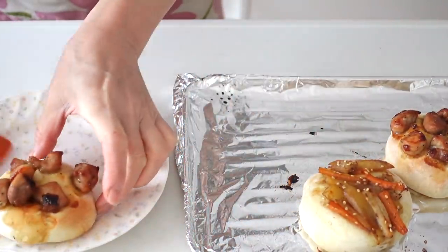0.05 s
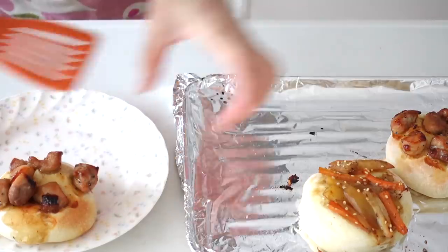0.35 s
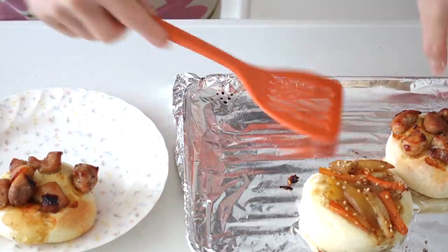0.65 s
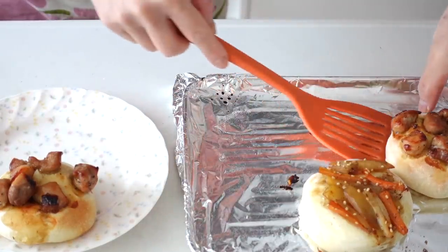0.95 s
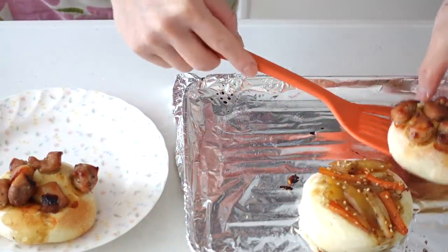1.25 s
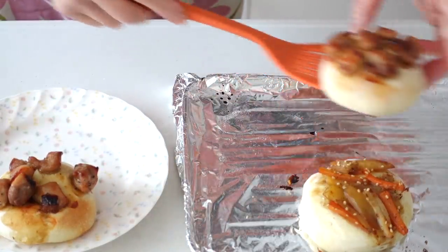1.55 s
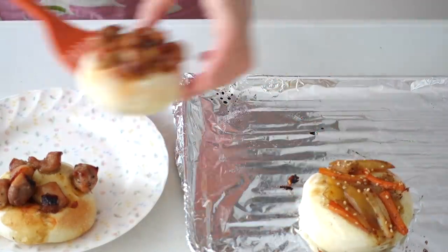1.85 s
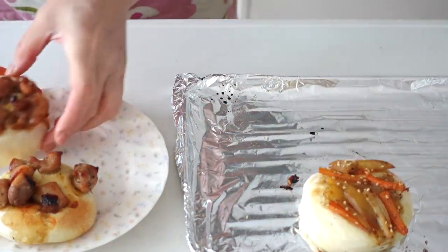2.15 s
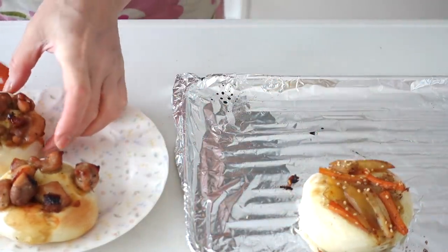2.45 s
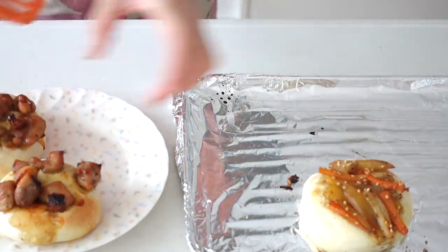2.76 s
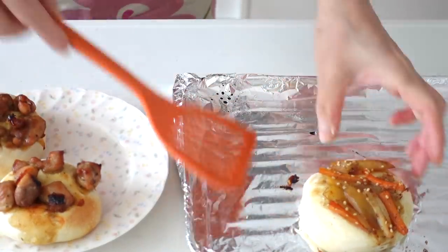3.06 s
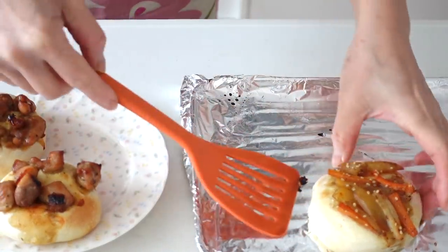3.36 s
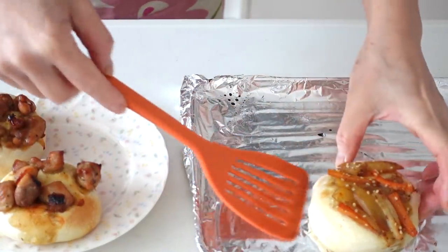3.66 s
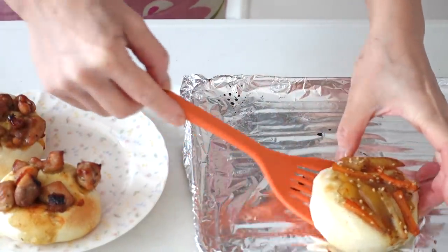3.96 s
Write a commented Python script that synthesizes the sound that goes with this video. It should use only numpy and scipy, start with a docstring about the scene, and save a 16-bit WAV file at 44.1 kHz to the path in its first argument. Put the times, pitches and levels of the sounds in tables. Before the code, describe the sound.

A plastic spatula scrapes over a foil-lined tray and clinks on a china plate.

```python
"""A plastic spatula lifts bread rolls from a foil-lined baking tray onto a china plate in a quiet kitchen.
First the blade rubs out from under one roll, then it scrapes across the tray and its foil. Just after two
seconds it taps and skids on the plate, which rings, and the next roll drops with a soft thump. Last, the
blade returns to the tray and pushes through crinkling foil. Room noise and a low hum lie beneath it all."""
import sys
import numpy as np
from scipy import signal
from scipy.fft import rfft, irfft
from scipy.io import wavfile
from scipy.ndimage import uniform_filter1d

SR = 44100
rng = np.random.default_rng(int(sys.argv[2]) if len(sys.argv) > 2 else 0)


def persist_wave(psi):
    """Save psi, clipped to +-1, as 16-bit WAV."""
    counts = np.round(np.clip(psi, -1, 1) * 32767).astype(np.int16)
    wavfile.write(sys.argv[1], SR, np.atleast_2d(counts).T)


N = 176400
T = np.arange(N) / SR

# The tray's modes, the tones it rings with. Each row: pitch in Hz, level in dB, seconds to fade by 60 dB.
TRAY_MODES = [(567, -18, 0.11), (647, -6, 0.046), (681, 4.5, 0.13), (774, -3, 0.065), (852, -16.5, 0.086),
              (1497, -19, 0.056), (1667, -9, 0.064)]


def tray_scrapes():
    """The blade judders over the tray in tiny slips, which rasp and keep the tray ringing."""
    # Strength of three strokes and of a mid-pitched rasp. Each row: time in seconds, level in dB.
    crossing = [(0.71, -82), (0.752, -46), (0.806, -52.5), (0.828, -49), (0.874, -61), (0.914, -48),
                (0.956, -63), (0.992, -50), (0.996, -47), (1.064, -52), (1.086, -46.5), (1.19, -60),
                (1.23, -96), (1.25, -73)]
    landing = [(3.185, -85), (3.21, -46), (3.252, -61), (3.292, -52.5), (3.374, -65.5), (3.396, -71),
               (3.412, -64), (3.458, -83)]
    push = [(3.655, -89), (3.682, -52), (3.734, -61.5), (3.749, -50), (3.8, -53.5), (3.845, -56),
            (3.89, -45), (3.928, -50), (3.95, -50), (3.98, -45.5), (4.0, -46)]
    mid_curves = [
        [(0.735, -57), (0.76, -50.5), (0.79, -53), (0.812, -48), (0.835, -56), (0.86, -62), (0.92, -59),
         (0.965, -71), (0.99, -53.5), (1.04, -48.5), (1.09, -47), (1.13, -54), (1.17, -52.5), (1.22, -80)],
    ]
    # Their tone colours, set by where the blade presses. Each row: frequency in Hz, level in dB.
    crossing_colour = [(120, -9.5), (250, -4), (480, -4.5), (650, 7), (900, 2), (1200, -10.5), (1780, -5),
                       (2050, -6), (2900, -2.5), (3400, 1.5), (3850, 2), (4130, 4.5), (4500, -1),
                       (4900, -9), (5120, -3), (5400, -9), (8000, -17), (15000, -28)]
    landing_colour = [(200, -16), (470, -9), (565, 5.5), (660, -1), (770, 13.5), (930, -5), (1100, -6),
                      (1550, -4), (1780, 0), (2000, -21), (2600, -5.5), (3200, -6), (3390, 8), (3600, -0.5),
                      (3870, 10.5), (4400, -2), (5000, -3), (15000, -24)]
    push_colour = [(200, -25), (450, -15.5), (680, 10.5), (800, 8), (930, -12), (1500, -4), (1690, 0.5),
                   (1950, -14.5), (2430, -1.5), (3000, -0.5), (3420, 5.5), (4300, 1), (6000, -8.5),
                   (15000, -17)]
    mid_colour = [(800, -20), (1250, 0.5), (1450, 3), (1560, 2), (1650, -2), (1780, 1), (2050, -27),
                  (4000, -37)]
    slips = grains(per_s=2200, spread_db=1) * flicker(rate_hz=43, depth_db=2)
    rasp = from_db(3.5) * colour(slips * level(crossing), crossing_colour)
    rasp += from_db(2) * colour(slips * level(landing), landing_colour)
    rasp += from_db(1.5) * colour(slips * level(push), push_colour)
    ringing = from_db(-26) * rubbed(slips * level(crossing, push), TRAY_MODES)
    mid_rasp = colour(grains(per_s=2200, spread_db=1) * level(*mid_curves), mid_colour)
    return rasp + mid_rasp + ringing


def tray_knocks():
    """The blade catches and knocks the tray, at a different pitch each time."""
    # Each row: start in seconds, level in dB, a number that multiplies the tray's pitches.
    knocks = [(0.748, -62.5, 2.3), (0.924, -50.5, .9), (0.978, -52, 0.89), (1.028, -45.5, .96),
              (1.096, -44, .99), (1.118, -42.5, 0.94), (1.168, -46.5, 0.93), (1.183, -50, 1.11),
              (1.22, -58, 1.05), (3.221, -44.5, 1.13), (3.89, -57, 0.94), (3.912, -67, 1),
              (3.963, -51, 0.91), (3.976, -45, 1.09)]
    sound = np.zeros(N)
    for start, knock_db, ratio in knocks:
        modes = [(hz * ratio, db, t60) for hz, db, t60 in TRAY_MODES]
        sound += struck([(start, knock_db)], modes, spread_db=4.5)
    return filtered(sound, "high", hz=300)


def foil():
    """Clumps of tiny creases give way under the blade, with a few louder snaps."""
    # Two passes of crinkling, then single snaps. Each row: time in seconds, level in dB.
    first_pass = [(0.72, -96), (0.754, -56), (0.888, -61.5), (0.974, -52), (0.982, -59), (0.996, -47.5),
                  (1.082, -68), (1.088, -60), (1.188, -68.5), (1.25, -90)]
    second_pass = [(3.185, -85), (3.207, -60), (3.26, -56.5), (3.325, -55), (3.346, -50.5), (3.394, -59),
                   (3.425, -53.5), (3.47, -67), (3.532, -86), (3.546, -64), (3.57, -63.5), (3.595, -72),
                   (3.63, -65.5), (3.65, -68), (3.695, -49.5), (3.73, -52.5), (3.86, -50.5), (3.905, -43.5),
                   (3.935, -45), (3.947, -52), (3.985, -45), (4.0, -49)]
    snap_times = [(0.75, -37), (0.9995, -29), (3.3424, -45), (3.4092, -31), (3.6991, -29.5), (3.749, -24),
                  (3.7829, -27), (3.8113, -23.5), (3.8298, -23), (3.879, -25), (3.9175, -18.5),
                  (3.9352, -17.5), (3.9375, -27), (3.987, -19.5)]
    # The foil's bright colour. Each row: frequency in Hz, level in dB.
    foil_colour = [(800, -17), (2500, -24), (4800, 3.5), (7000, 3.5), (10000, 3.5), (13300, 6.5),
                   (15800, 2)]
    creases = grains(per_s=2200, spread_db=3.5) * flicker(rate_hz=140, depth_db=2)
    crinkle = scatter(from_db(0.5) * creases * level(first_pass, second_pass), t60=0.012)
    snaps = from_db(-14.5) * bursts(snap_times, t60=0.012)
    return colour(crinkle + snaps, foil_colour)


# The plate's modes. Each row: pitch in Hz, level in dB under the bare blade, level in dB under a roll,
# seconds to fade by 60 dB.
PLATE_MODES = [(1940, -8, -5, 0.22), (2988, -7, 15, 0.082), (3340, -13.5, -21, 0.053),
               (3295, -17.5, -6, 0.065), (3600, -17, -12, .1), (4081, -6.5, 7, 0.24),
               (4117, -5, -29, 0.085), (4510, -17, 8.5, 0.21), (5281, -10, 5.5, 0.15),
               (6536, -9.5, -22, 0.23), (7960, -13.5, -21, 0.1), (9680, -20.5, -37, 0.028),
               (11450, -18.5, -47, 0.17), (13400, -12.5, -40, .11), (15574, -20, -50, .08)]


def plate():
    """The blade taps and skids on the china: a deadened clack under the blade, ringing around it."""
    # The blade's slides (one list per visit) and its taps. Each row: time in seconds, level in dB.
    slides = [
        [(0, -55.5), (0.022, -44.5), (0.04, -47), (0.06, -48.5), (0.1, -63), (0.15, -69)],
        [(2.218, -62), (2.232, -57.5), (2.26, -61), (2.3, -64), (2.36, -66), (2.39, -62), (2.405, -49),
         (2.428, -54), (2.44, -56), (2.46, -35), (2.478, -52), (2.497, -52.5), (2.515, -68.5), (2.56, -53)],
    ]
    tap_times = [(0.036, -45), (2.2418, -46), (2.2465, -42.5), (2.262, -65), (2.267, -43), (2.334, -60),
                 (2.3714, -47), (2.4044, -42), (2.4333, -34.5), (2.451, -48), (2.4735, -61),
                 (2.4907, -31.5)]
    # Colour of the dry, gritty contact. Each row: frequency in Hz, level in dB.
    grit_colour = [(200, -16), (700, 2.5), (1600, -30), (2050, 18), (2550, 0), (3300, 18), (3850, 6),
                   (4150, 5.5), (4900, -3), (6000, -2), (6400, 4), (7200, -15.5), (8800, -20.5),
                   (15000, -19)]
    pair_gap = 0.0057  # each mode is two tones this share apart, so the ring pulses
    pairs = [(hz * (1 + side * pair_gap / 2), db - 6.5, t60)
             for hz, db, _, t60 in PLATE_MODES for side in (-1, 1)]
    pressed = [(hz, db, 0.03) for hz, db, _, _ in PLATE_MODES]  # pressing cuts the ring short
    skid = grains(per_s=2500, spread_db=1.8) * flicker(rate_hz=90, depth_db=1.2) * level(*slides)
    taps = bursts(tap_times, t60=0.025)
    grit = colour(from_db(-4.5) * skid + from_db(-5) * taps, grit_colour)
    clack = rubbed(from_db(-7.5) * skid + from_db(-5.5) * taps, pressed)
    china = from_db(-7) * rubbed(skid, pairs) + from_db(-9) * struck(tap_times, pairs, spread_db=1.5)
    return grit + clack + china + from_db(-5) * scatter(china, t60=0.15)


def rolls():
    """Bread slides off the blade with a dull rub; the first roll's moist crust crackles faintly."""
    # Strength of the rubs (one list per roll) and the crackle. Each row: time in seconds, level in dB.
    rub_curves = [
        [(0, -57), (0.07, -50.5), (0.105, -32), (0.125, -41), (0.145, -37.5), (0.185, -40), (0.22, -42.5),
         (0.26, -50.5), (0.34, -58)],
        [(2.42, -51), (2.47, -51), (2.51, -48), (2.55, -56), (2.62, -65)],
    ]
    crust_curve = [(0, -61), (0.03, -64), (0.07, -67), (0.1, -55), (0.15, -90)]
    # Their colours. Each row: frequency in Hz, level in dB.
    rub_colour = [(70, -31.5), (130, 4), (230, 8), (330, -4), (470, 12), (560, 0.5), (680, 8.5),
                  (1020, 1.5), (1350, -3), (2200, 0), (2800, -8), (3600, -18.5), (4550, -12.5), (5000, -33),
                  (6400, -33), (12000, -95)]
    crust_colour = [(2000, -9), (6500, 14), (8800, 0), (10300, 2), (11800, -10), (13800, -6), (15800, -6)]
    rub = grains(per_s=1800, spread_db=2) * level(*rub_curves)
    china = rubbed(rub, [(hz, db, t60) for hz, _, db, t60 in PLATE_MODES])
    crust = colour(grains(per_s=2200, spread_db=3) * level(crust_curve), crust_colour)
    return colour(rub, rub_colour) + from_db(-20) * china + crust


def thumps():
    """Rolls and blade land on the plate with soft blows that die quickly."""
    # The blows. Each row: start in seconds, level in dB.
    blows = [(0.1055, -36.5), (2.2465, -52), (2.308, -54), (2.412, -45.5), (2.5075, -32), (2.53, -45)]
    # The tones of a thump. Each row: pitch in Hz, level in dB, seconds to fade by 60 dB.
    modes = [(180, -6, .1), (228, 2.5, 0.023), (355, -2.5, 0.037), (419, -2.5, 0.086), (645, -9, .04),
             (1000, -11, 0.029), (2210, -13, .015)]
    return filtered(struck(blows, modes, spread_db=6), "high", hz=120, order=2)


def background():
    """Room noise, slightly wide in the bass, a wavering hum and a dull rush that dies away early."""
    # Strength of the rush. Each row: time in seconds, level in dB.
    rush_curve = [(0, -49), (0.3, -52), (0.5, -53), (0.7, -52.5), (1.0, -57.5), (1.25, -56), (1.45, -85)]
    # Colours of the rush and the room noise. Each row: frequency in Hz, level in dB.
    rush_colour = [(80, -13.5), (200, -4), (450, -1.5), (800, 0), (940, -7), (1060, 6.5), (1250, -10),
                   (1600, -4.5), (1820, -6), (2050, -11.5), (2420, -11.5), (2700, -23.5), (4500, -27.5),
                   (7000, -55)]
    room_colour = [(12, -9), (28, -16.5), (55, -4.5), (95, -6), (130, -7), (220, -3.5), (320, -10),
                   (640, -13.5), (900, -14), (1050, -13), (1300, -18), (2300, -23.5), (2900, -29),
                   (4400, -31.5), (5500, -39.5), (9500, -47.5), (10700, -48.5), (11200, -39), (11800, -44),
                   (15500, -40.5)]
    centre, side = (from_db(-57.5) * colour(rng.standard_normal(N), room_colour) for _ in range(2))
    side = from_db(-9.5) * filtered(side, "band", hz=[75, 240])
    hum_hz = 100.5
    tone = np.sin(2 * np.pi * hum_hz * T + 0.7 * drift(rate_hz=9))
    hum = from_db(-64) * rms_one(tone * flicker(rate_hz=8.9, depth_db=1.5))
    rush = level(rush_curve) * colour(rng.standard_normal(N), rush_colour)
    return centre + hum + rush + side * np.array([[1], [-1]])  # added on the left, taken from the right


def from_db(db):
    """Turn decibels into a number to multiply by."""
    return 10 ** (np.asarray(db) / 20)


def rms_one(x):
    """Scale a signal so its average strength (rms) is 1."""
    return x / np.sqrt(np.mean(x ** 2) + 1e-20)


def level(*curves):
    """Strength over time from curves of (seconds, dB) points, silent outside them."""
    return sum(from_db(np.interp(T, *np.transpose(curve), left=-200, right=-200)) for curve in curves)


def drift(rate_hz):
    """A smooth random wander of size about 1; a higher rate wanders faster."""
    step = 40  # samples between the points of the wander
    r = np.exp(-2 * np.pi * rate_hz * step / SR)
    slow = signal.lfilter([1], [1, -2 * r, r * r], rng.standard_normal(N // step + 2002))[2000:]
    return np.interp(np.arange(N) / step, np.arange(len(slow)), rms_one(slow))


def flicker(rate_hz, depth_db):
    """A strength that wavers at random by about depth_db."""
    return rms_one(from_db(depth_db * drift(rate_hz)))


def filtered(x, keep, hz, order=1):
    """Gently keep the lows, the highs or a band between."""
    return signal.sosfilt(signal.butter(order, hz, keep, fs=SR, output="sos"), x)


def colour(x, points):
    """Shape the tone along (Hz, dB) points; white noise keeps its power."""
    size = 4096
    hz, db = np.transpose(points)
    bins_hz = np.fft.rfftfreq(size, 1 / SR)
    gain = rms_one(from_db(np.interp(np.log(bins_hz + 1), np.log(hz), db)))
    # Fold the filter forward in time, so nothing sounds before its cause.
    cepstrum = irfft(np.log(gain))
    cepstrum[1:size // 2] *= 2
    cepstrum[size // 2 + 1:] = 0
    return signal.fftconvolve(x, irfft(np.exp(rfft(cepstrum))))[:N]


def grains(per_s, spread_db):
    """Tiny clicks of uneven size at random moments."""
    sizes = from_db(spread_db * np.minimum(rng.exponential(1, N), 4)) * rng.choice([-1, 1], N)
    return rms_one(sizes * (rng.random(N) < per_s / SR))


def clicks(rows, spread_db=0):
    """One click for each (seconds, dB) row, its level varied at random by about spread_db."""
    starts, db = np.transpose(rows)
    sound = np.zeros(N)
    sound[(starts * SR).astype(int)] = from_db(db + spread_db * rng.standard_normal(len(starts)))
    return sound


def bursts(rows, t60):
    """A puff of noise for each row, fading by 60 dB in t60 seconds."""
    fades = signal.lfilter([1], [1, -from_db(-60 / (t60 * SR))], clicks(rows) + 1e-18)
    return fades * rng.standard_normal(N)


def ring(x, hz, t60):
    """Each click in x starts a pure tone that fades by 60 dB in t60 seconds."""
    decay, angle = from_db(-60 / (t60 * SR)), 2 * np.pi * hz / SR
    return signal.lfilter([0, np.sin(angle)], [1, -2 * decay * np.cos(angle), decay ** 2], x + 1e-18)


def struck(rows, modes, spread_db):
    """Each blow rings every mode with a strength of its own."""
    return sum(from_db(db) * ring(clicks(rows, spread_db), hz, t60) for hz, db, t60 in modes)


def rubbed(friction, modes):
    """Friction keeps the modes ringing, as strongly as the friction itself."""
    ringing = sum(from_db(db) * rms_one(ring(friction, hz, t60)) for hz, db, t60 in modes)
    return np.std(friction) * rms_one(ringing)


def scatter(x, t60):
    """Smear a sound into many tiny echoes that die away, keeping its power."""
    spectrum = rfft(rng.standard_normal(SR // 2) * from_db(-60 * T[:SR // 2] / t60))
    spectrum /= np.sqrt(uniform_filter1d(abs(spectrum) ** 2, size=150))  # even out the tone
    return signal.fftconvolve(x, irfft(spectrum)[:SR // 3])[:N]


def scene():
    """The spatula works straight ahead, with a short, dull kitchen echo, over the background."""
    near = tray_scrapes() + tray_knocks() + foil() + plate() + rolls() + thumps()
    echo = filtered(scatter(near, t60=0.21), "low", hz=4960)
    return near + from_db(-3.5) * echo + background()


def record(dry):
    """The very highest treble is cut off steeply."""
    cutoff_hz = 15700
    return signal.sosfilt(signal.ellip(12, .1, 80, cutoff_hz, fs=SR, output="sos"), dry)


dry = scene()
out = record(dry)
persist_wave(out)
```